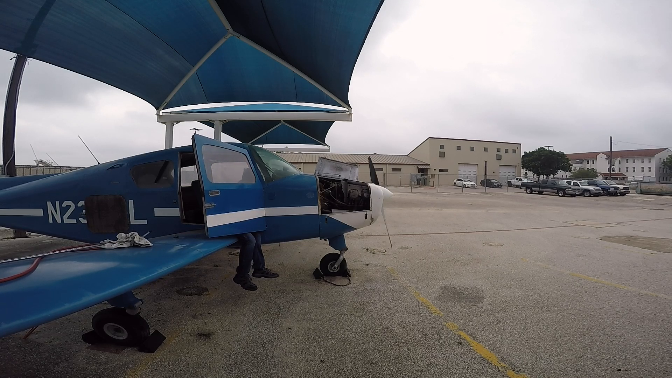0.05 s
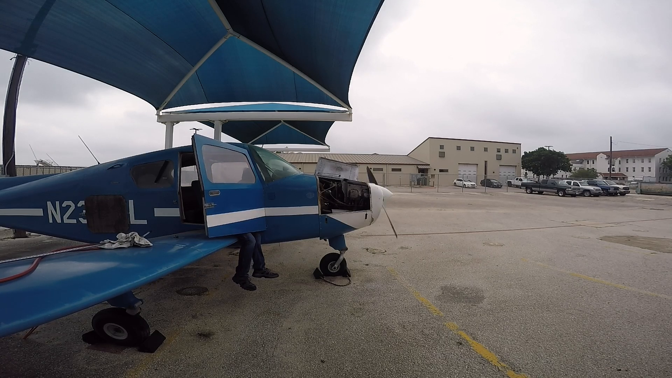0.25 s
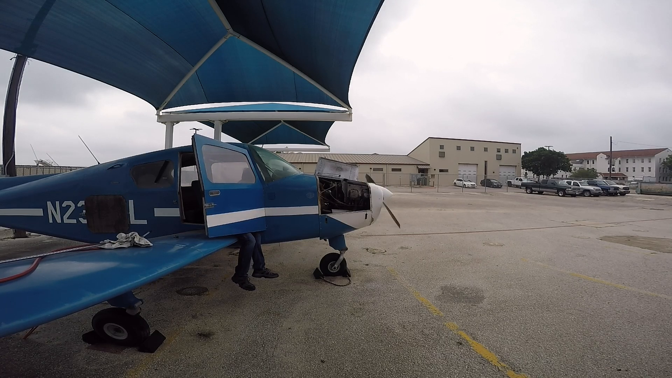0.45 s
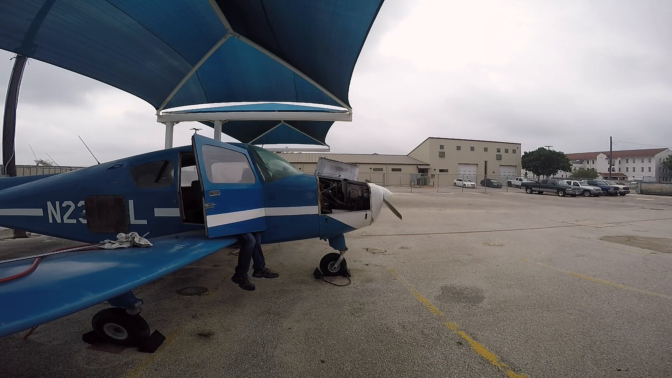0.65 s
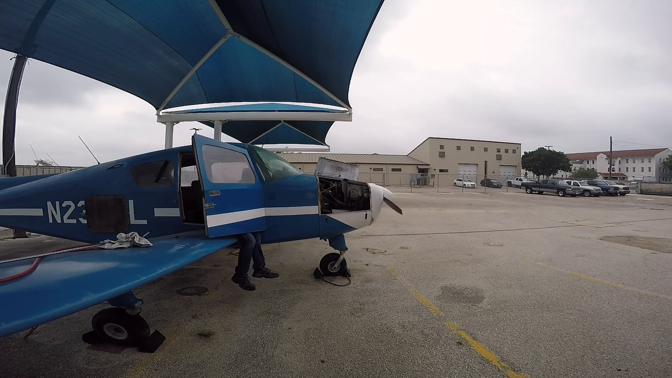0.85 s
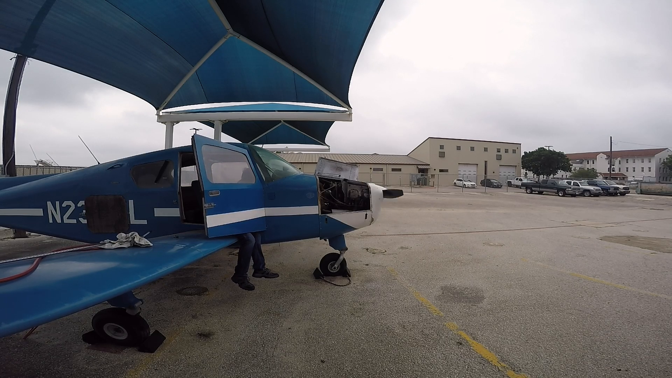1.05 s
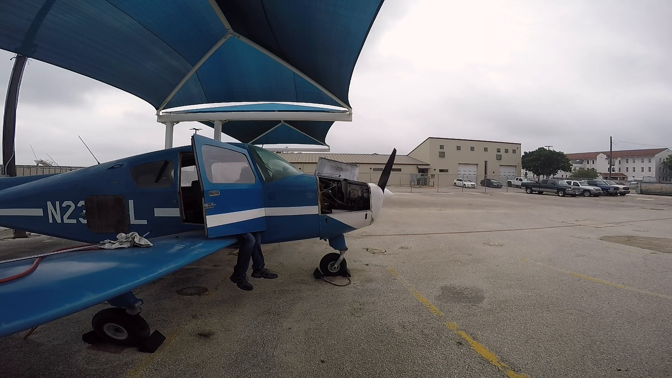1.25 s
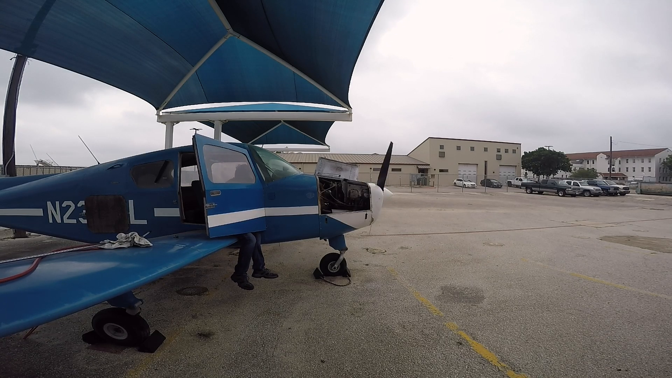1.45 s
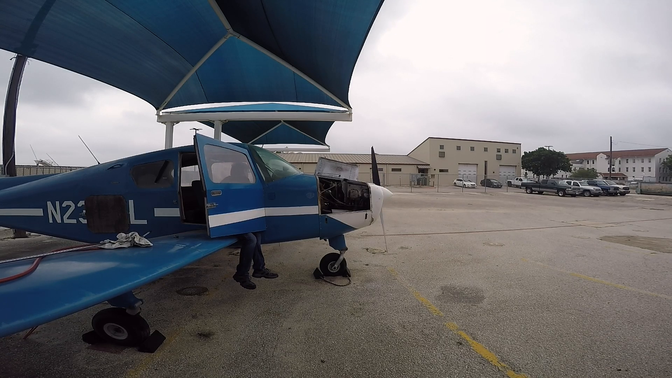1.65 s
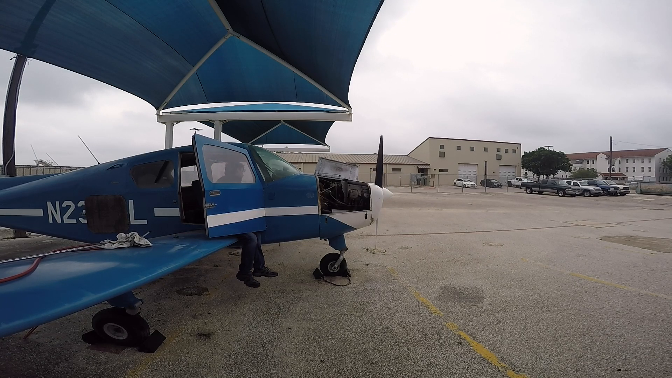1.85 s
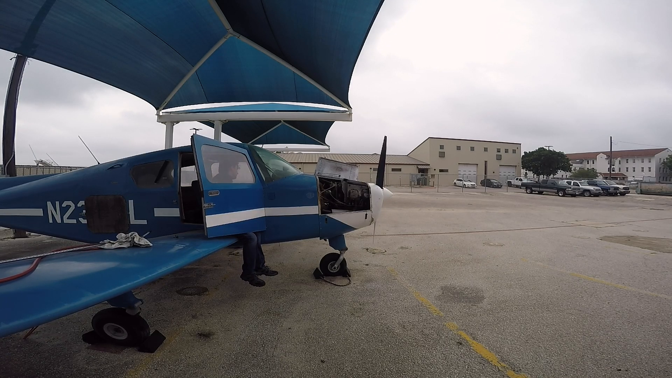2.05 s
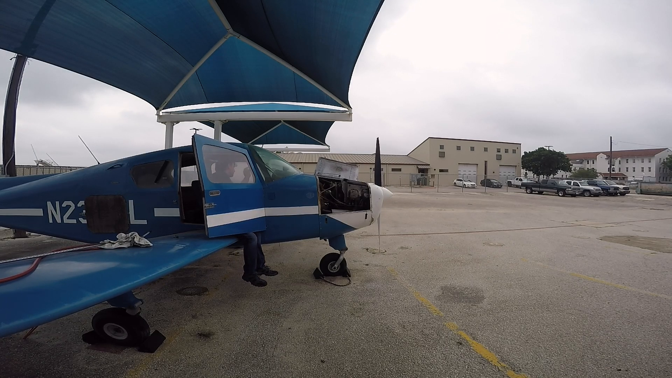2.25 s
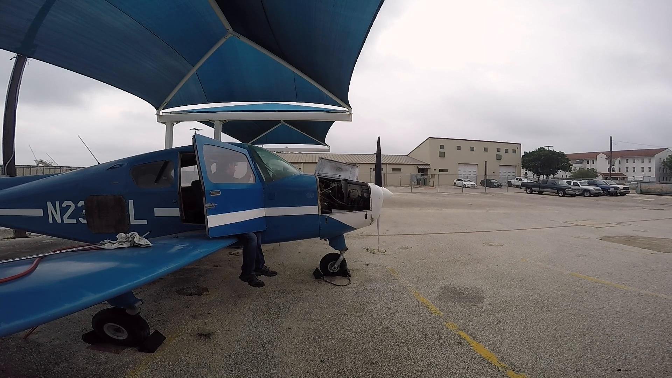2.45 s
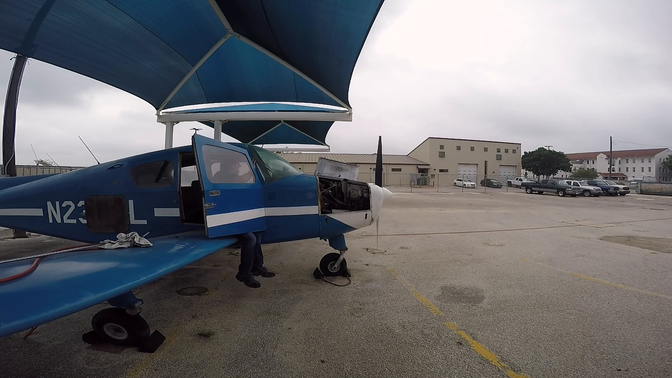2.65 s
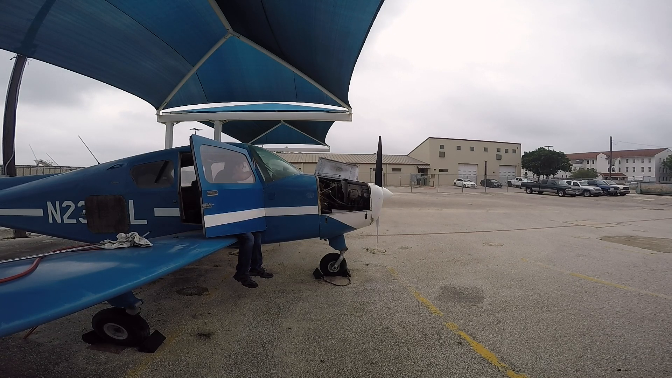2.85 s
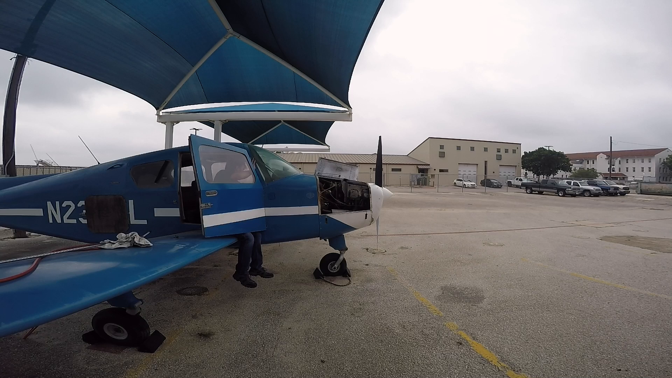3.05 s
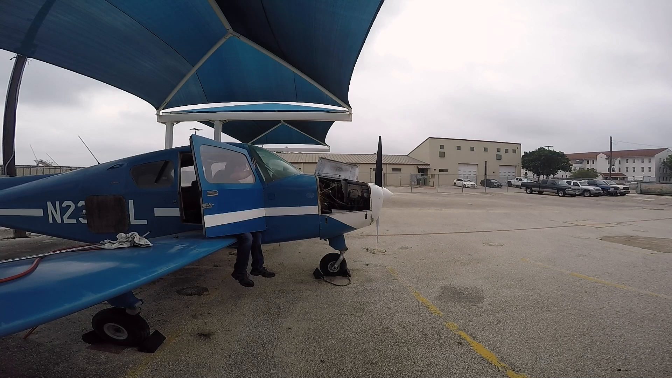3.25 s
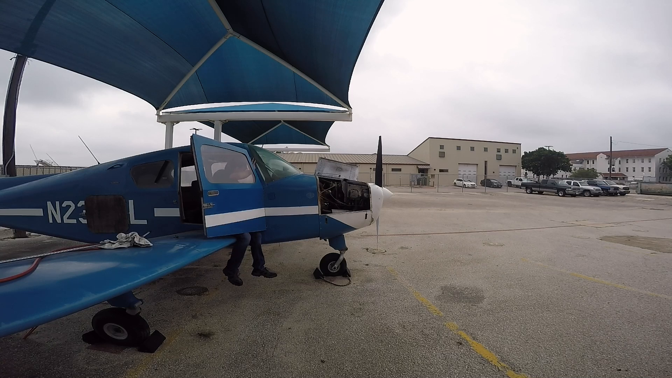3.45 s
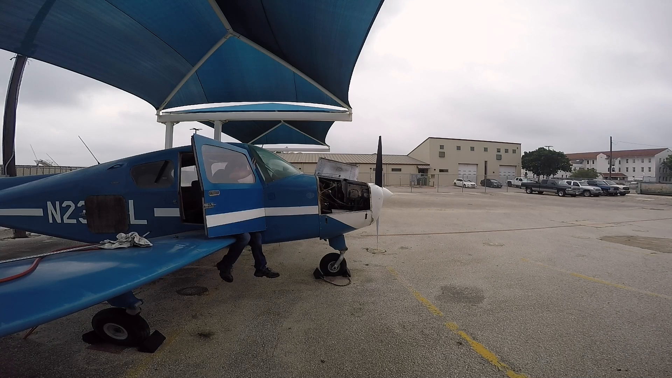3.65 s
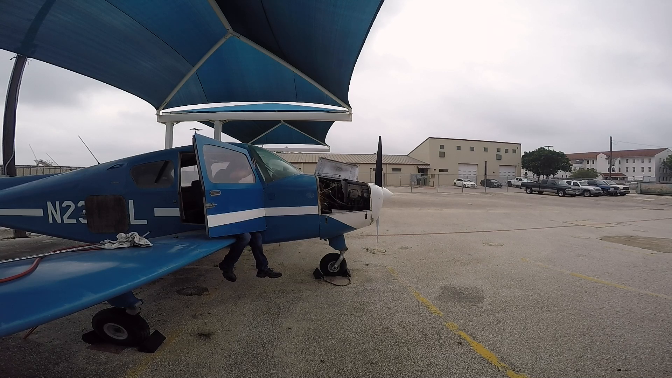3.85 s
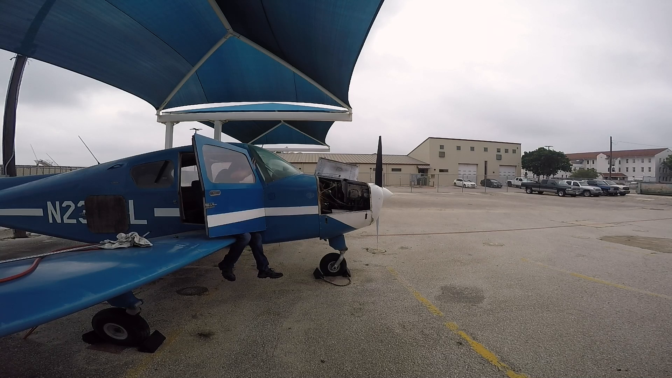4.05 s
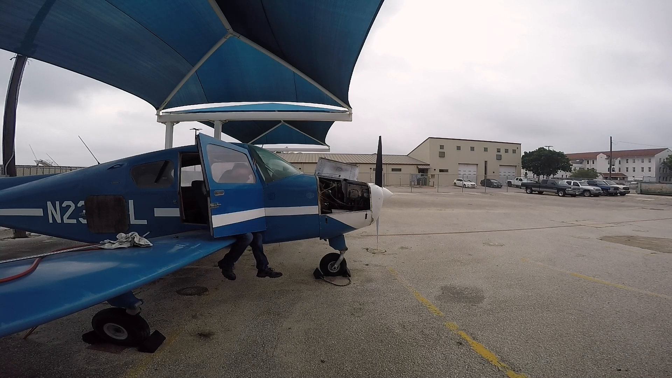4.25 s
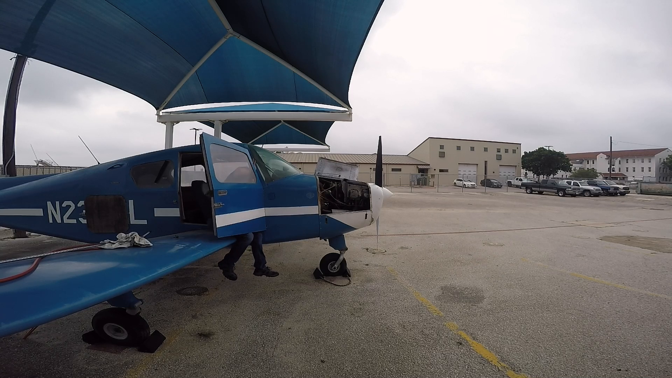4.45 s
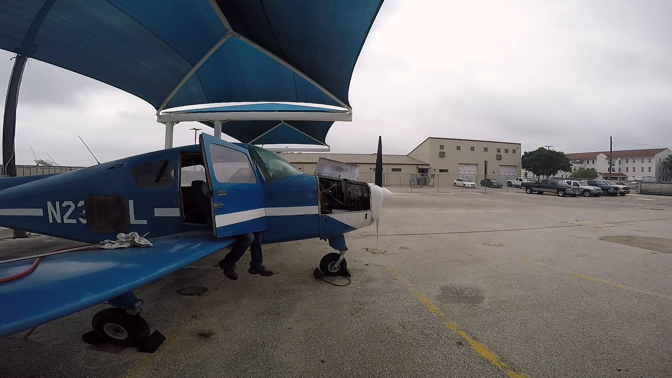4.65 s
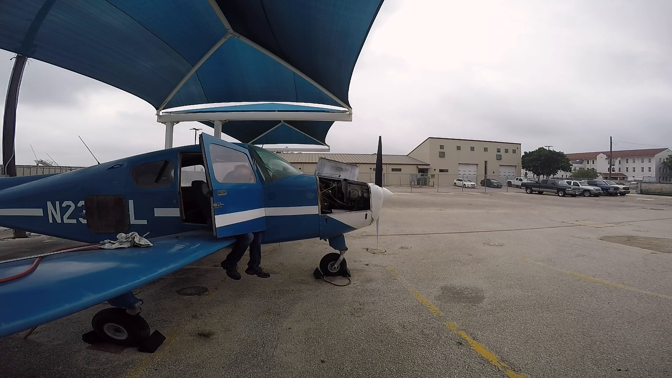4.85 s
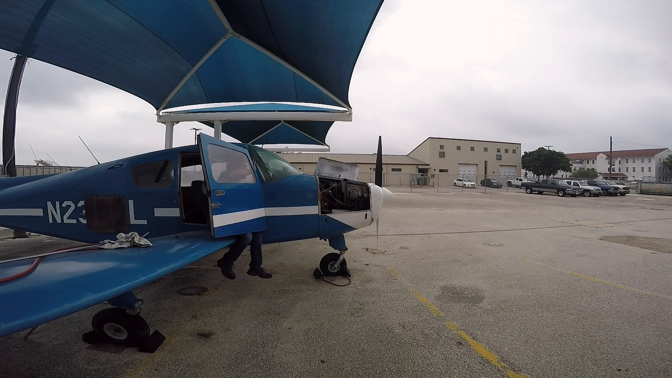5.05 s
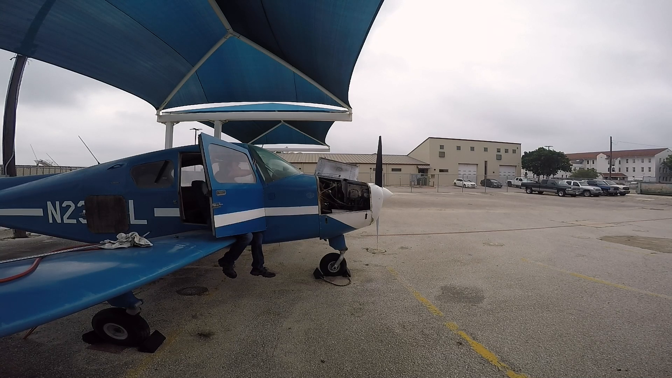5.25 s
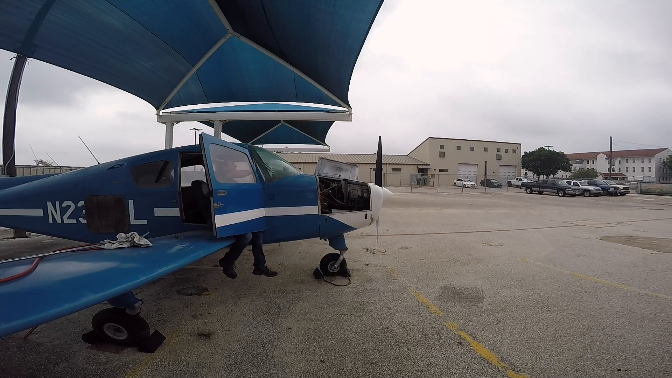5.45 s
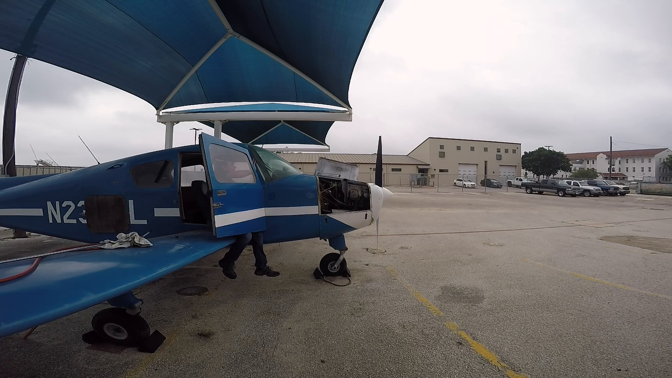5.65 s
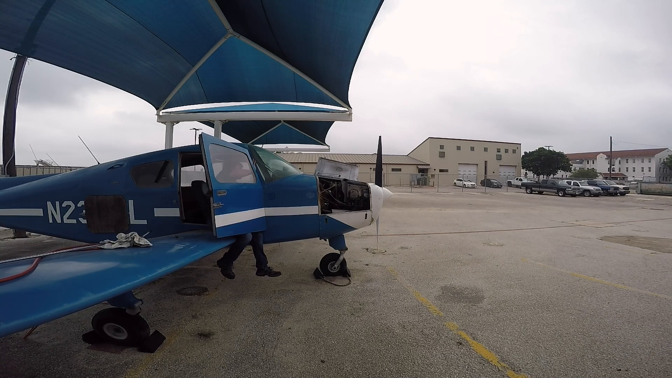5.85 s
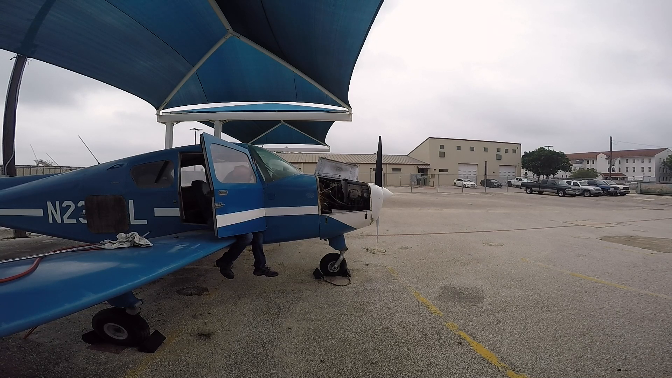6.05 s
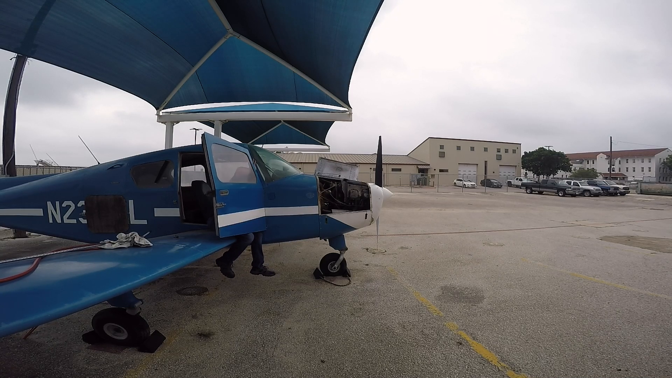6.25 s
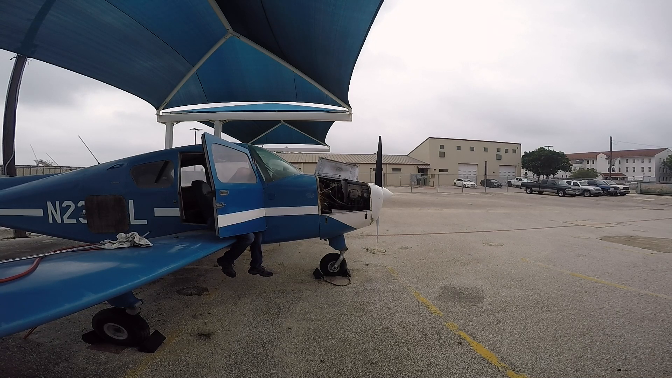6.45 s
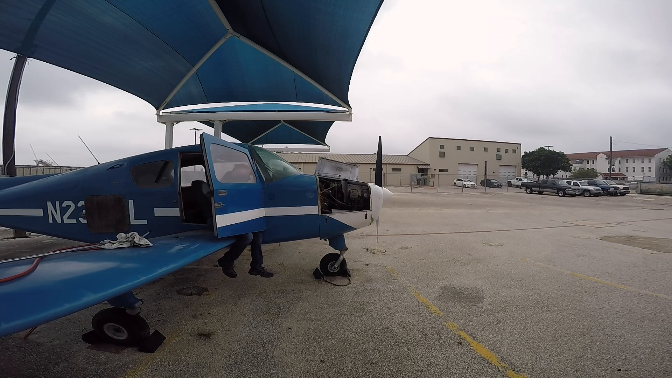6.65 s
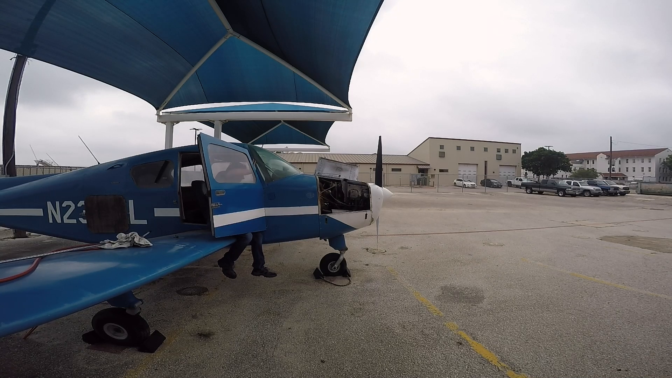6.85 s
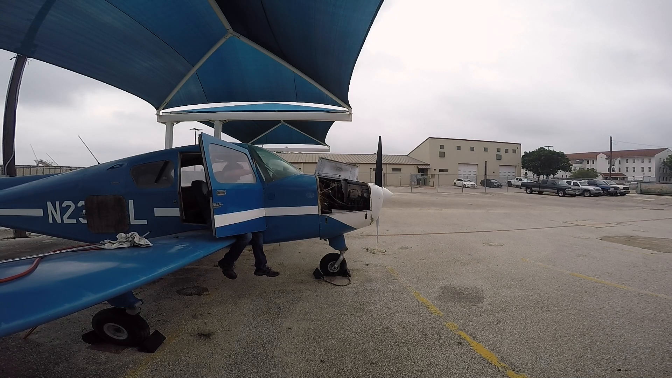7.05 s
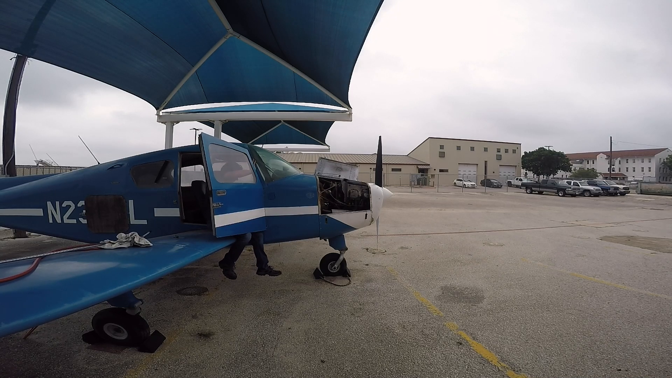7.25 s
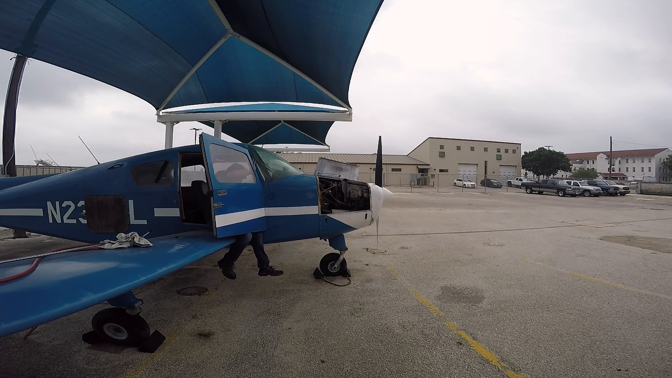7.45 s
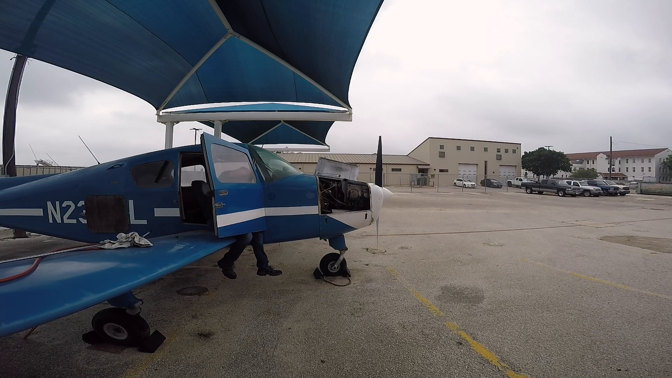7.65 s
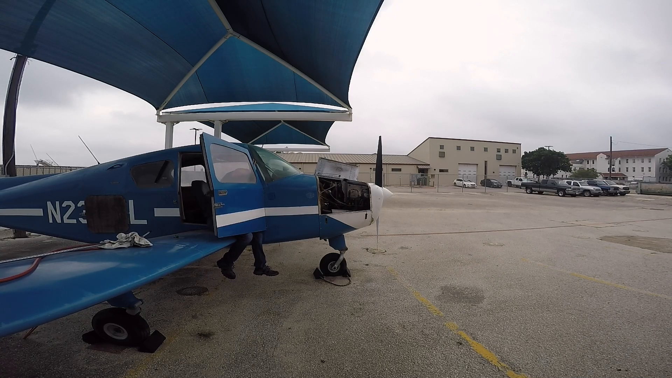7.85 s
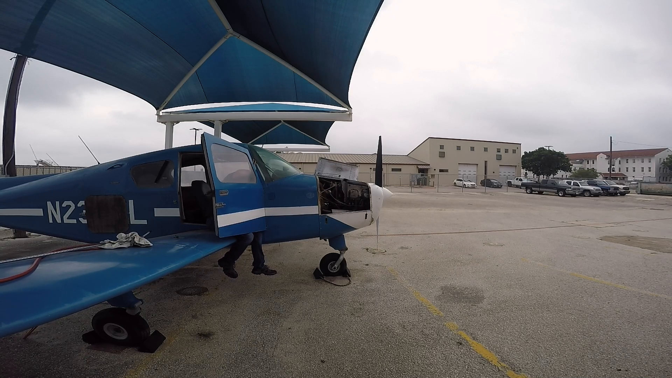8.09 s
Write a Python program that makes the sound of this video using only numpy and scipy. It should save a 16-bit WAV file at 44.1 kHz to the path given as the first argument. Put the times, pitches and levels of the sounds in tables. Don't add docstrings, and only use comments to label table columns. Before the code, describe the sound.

A small aircraft engine chugs over on its starter without catching, rattles to a stop, then a distant engine idles with ticking valves, wind and footsteps.

```python
import sys
import numpy as np
from scipy import signal
from scipy.fft import rfft, irfft
from scipy.io import wavfile
from scipy.ndimage import uniform_filter1d

SR = 44100
rng = np.random.default_rng(int(sys.argv[2]) if len(sys.argv) > 2 else 0)


def gain_from_db(level_db):
    decades = np.asarray(level_db, float) / 20
    return 10 ** decades


def master_out(mix):
    frames = np.transpose(np.atleast_2d(mix))
    ceiling = np.clip(frames, -1, 1)
    pcm = np.round(ceiling * 32767).astype(np.int16)
    wavfile.write(sys.argv[1], SR, pcm)


N = 358091
T = np.arange(N) / SR


def noise():
    return rng.standard_normal(N)


def evened(x):
    return x / np.sqrt(np.mean(x ** 2) + 1e-20)


def curve(rows, axis=1):
    rows = np.asarray(rows, float)
    return np.interp(T, rows[:, 0], rows[:, axis])


def colour(x, air, modes=(), air_db=0, size=16384):
    hz = np.fft.rfftfreq(size, 1 / SR)
    air_hz, db = np.transpose(air)
    smooth_db = np.interp(np.log(hz + 1), np.log(air_hz), db, -90, -90)
    power = gain_from_db(smooth_db + air_db) ** 2
    for mode_hz, width, mode_db in modes:
        power = power + gain_from_db(mode_db) ** 2 / (1 + ((hz - mode_hz) / width) ** 2 * 2) ** 2
    fold = irfft(np.log(power) / 2)
    fold[1:size // 2] *= 2
    fold[size // 2 + 1:] = 0
    taps = irfft(np.exp(rfft(fold)))
    return signal.oaconvolve(x, taps / np.linalg.norm(taps))[:N]


def ring(x, hz, width):
    r = np.exp(-np.pi * width / SR)
    poles = [1, -2 * r * np.cos(2 * np.pi * hz / SR), r * r]
    return signal.lfilter([1, 0, -1], poles, x) * np.sqrt((1 - r * r) / 2)


def lumps(hz):
    f = np.fft.rfftfreq(N // 32 * 2, 16 / SR)
    phase = np.exp(2j * np.pi * rng.random(len(f)))
    slow = irfft(phase * (f > 0) / (1 + (f / hz) ** 2))
    return np.interp(T, np.arange(len(slow)) * 16 / SR, evened(slow))


def restless(drive, modes, hz, spread_db):
    crank = 2 * SR
    rung = 0
    for mode_hz, width, db in modes:
        push = drive[:crank] * gain_from_db(db + spread_db * lumps(hz)[:crank])
        twice = ring(ring(push, mode_hz, width), mode_hz, width)
        rung = rung + twice / np.sqrt(SR / 6 / width)
    return np.pad(rung, (0, N - crank))


def blow(s, db, rise, t60):
    age, out = T[:SR], np.zeros(N + SR)
    out[round(s * SR):][:SR] = gain_from_db(db - 60 * age / t60) * np.clip(age / rise, 0, 1) ** 2
    return out[:N]


def held(s, length, db, edge):
    return gain_from_db(db) * np.clip(np.minimum(T - s, s + length - T) / edge, 0, 1)


# start in seconds, level in dB, rise in seconds, t60 in seconds, muffler in dB.
PUFFS = [
    (0, -23.5, 0.0011, 1, -17.5),
    (0.154, -17.5, 0.007, 0.54, -18),
    (.374, -16.5, 0.011, 0.58, -20),
    (0.587, -17, 0.0075, 0.44, -16.5),
    (0.799, -16.5, 0.011, 0.61, -19.5),
    (0.994, -17.5, 0.0091, 0.4, -18),
    (1.408, -23.5, 0.026, 0.53, -14),
]
# pitch in Hz, width in Hz, level in dB.
PIPE_MODES = [(630, 51, -10.5), (932, 48, -4), (1214, 56, -5), (1530, 53, -3.5), (1934, 82, 1),
              (2150, 19, 2), (2380, 110, -0.5), (2757, 160, -0.5), (2800, 19, -9), (3440, 48, -15.5),
              (4160, 130, -10), (4630, 270, -15)]
# pitch in Hz, level in dB per Hz.
PIPE_AIR = [(110, -57), (180, -12.5), (922, -14.5), (1650, -4.5), (2360, -11), (2590, -11), (2790, -4),
            (5590, -13), (12300, -17), (15100, -31), (16000, -60.5)]
# pitch in Hz, width in Hz, level in dB.
MUFFLER_MODES = [(267, 34, -9.5), (426, 500, -6.5), (651, 105, -13.5), (915, 95, -21), (1163, 86, -4.5),
                 (1320, 430, -7), (770, 1020, 0)]


def exhaust():
    push = 0
    slow = blow(0, PUFFS[0][4], 0.0012, 0.23)
    for s, db, rise, t60, _ in PUFFS:
        crack = blow(s, db + 2.0, rise, 0.14)
        push = push + blow(s, db, rise, t60) + crack
    for s, _, rise, t60, muffler_db in PUFFS[1:]:
        slow = slow + blow(s - .6 * rise, muffler_db, rise + .018, 1.1 * t60)
    air = gain_from_db(1.2 * lumps(50)) * noise()
    muffler = restless(slow * air * gain_from_db(-6), MUFFLER_MODES, 16, 1.5)
    return colour(push * air, PIPE_AIR, PIPE_MODES, air_db=-6.5) + muffler


# start in seconds, end in seconds, hiss in dB, gear load in dB.
SQUEEZES = [
    (0.053, 0.155, -20.5, -24),
    (0.267, 0.379, -19, -23),
    (0.481, 0.593, -20.5, -23.5),
    (0.689, 0.807, -20.5, -26.5),
    (0.892, 0.995, -23, -25.5),
    (1.117, 1.314, -19.5, -25),
]
SQUEEZE_FULL = 0.54
BLOWDOWN_DB = [-25, -25.5, -23, -24.5, -25, -27]
# start, fullest and end in seconds, level in dB, whistle in dB.
SETTLES = [
    (1.324, 1.33, 1.35, -22, -12),
    (1.403, 1.545, 1.636, -33.5, -17),
    (1.611, 1.635, 1.9, -49, -8),
]


def leak_rows():
    rows = [(a, a + SQUEEZE_FULL * (b - a), b, db, -7.5) for a, b, db, _ in SQUEEZES]
    full_s, length_s = 0.031, 0.12
    opens = [-length_s / 2] + [puff[0] - 0.0087 for puff in PUFFS[1:]]
    for s, db in zip(opens, BLOWDOWN_DB):
        rows.append((max(s, 0), max(s + full_s, 0), s + length_s, db, -14))
    return rows + list(SETTLES)


# pitch in Hz, width in Hz, level in dB.
SEAT_MODES = [(6690, 200, -13), (7200, 600, -5), (8450, 700, -2), (7850, 1300, -2.5), (9950, 150, -11.5)]
# pitch in Hz, level in dB per Hz.
SEAT_AIR = [(2500, -35), (4000, -27), (6000, -24), (9500, -31), (12000, -25), (16000, -39)]
# pitch in Hz, width in Hz.
WHISTLE = (12020, 380)


def leaks():
    flow, edge = np.zeros((2, N))
    for start, full, end, db, whistle_db in leak_rows():
        span = slice(round(start * SR), round(end * SR))
        swell_db = np.interp(T[span], [start, full, end], [-7, 0, -9])
        gate = np.clip(np.minimum(T[span] - start, end - T[span]) / 0.011, 0, 1)
        flow[span] += gate * gain_from_db(db + swell_db)
        edge[span] += gate * gain_from_db(db + whistle_db + 2.2 * swell_db)
    air = gain_from_db(1.0 * lumps(90)) * noise()
    hiss = colour(flow * air * gain_from_db(-13.0), SEAT_AIR)
    seats = restless(flow * air * gain_from_db(-2.5), SEAT_MODES, 21, 3.06)
    whistle = restless(edge * air, [(WHISTLE[0], WHISTLE[1], 0)], 40, 3.1)
    return hiss + seats + whistle


SLACK_DB = -28.5


def squeeze():
    arch, load_db = np.zeros((2, N))
    for start, end, _, gear_db in SQUEEZES:
        stroke = np.interp(T, [start, start + SQUEEZE_FULL * (end - start), end], [0, 1, 0])
        arch += stroke
        load_db += stroke * (gear_db - SLACK_DB)
    return arch, load_db


# time in seconds, level in dB.
ENGAGED = [
    (0, -1),
    (1.3, 0.5),
    (1.35, -9),
    (1.375, -8),
    (1.41, -10),
    (1.47, 1),
    (1.55, -0.2),
    (1.62, -21),
    (1.8, -19.5),
]


def mesh_tone(arch):
    fuzz = lumps(77) + 1j * lumps(53)
    opens = np.array(PUFFS)[:, 0]
    age = T - opens[np.searchsorted(opens, T, "right") - 1]
    hz = 2202 + 202 * np.exp(-age / .07) + 420 * age
    db = -32 + 15.5 * np.exp(-age / 0.04) + 8 * arch + curve(ENGAGED)
    tone = (fuzz * np.exp(2j * np.pi * np.cumsum(hz) / SR)).real
    return tone * gain_from_db(uniform_filter1d(db, size=400) - 3.0) * np.clip((1.8 - T) / .03, 0, 1)


# time in seconds, brush pitch in Hz, level in dB.
COAST = [
    (1.54, 1560, -64),
    (1.62, 1340, -57),
    (1.7, 1090, -58),
    (1.8, 880, -65),
    (1.86, 790, -74),
]


def rotor_whine():
    turns = np.cumsum(curve(COAST) * (1 + .008 * lumps(60))) / SR
    whine = sum(gain_from_db(.5 + 3.2 * lumps(20)) * np.sin(2 * np.pi * k * turns) for k in range(3, 8))
    return whine * gain_from_db(curve(COAST, axis=2)) * (T > COAST[0][0]) * (T < COAST[-1][0])


# time in seconds, peak in dB.
CLACKS = [
    (0.195, -4.5),
    (0.3187, -14),
    (0.5344, -22),
    (0.745, -15),
    (1.0405, -15),
    (1.1933, -7),
    (1.267, -9.5),
    (1.33, -12.5),
    (1.492, -23),
    (1.632, -20),
]
# pitch in Hz, width in Hz, level in dB.
CASE_MODES = [(1170, 70, -15), (1380, 70, -16), (1820, 50, -11), (1950, 60, -11), (2075, 60, -8),
              (2300, 140, -10), (2760, 90, -6), (2870, 110, -5), (3120, 80, -12), (3490, 150, -14)]
# pitch in Hz, level in dB per Hz.
CASE_AIR = [(150, -35), (400, -21.5), (1500, -17), (3500, -16.5), (6000, -30.5), (15000, -40)]


def starter():
    knock_gain = gain_from_db(1.4 * rng.exponential(1, N).clip(0, 4))
    teeth = knock_gain * (rng.random(N) < 2500 / SR) * rng.choice([-1, 1], N)
    teeth = evened(teeth) * np.clip((2.04 - T) / .3, 0, 1)
    arch, load_db = squeeze()
    load = gain_from_db(SLACK_DB + load_db + curve(ENGAGED) + 3.05 * lumps(12))
    clacks = sum(blow(s, db - 9.0, 0.0033, 0.082) for s, db in CLACKS)
    drive = (load * teeth + clacks * noise()) * gain_from_db(-2.0)
    case = colour(drive, CASE_AIR) + restless(drive, CASE_MODES, 6.9, 3.7)
    return case + mesh_tone(arch) + rotor_whine()


# start in seconds, peak in dB, rise in seconds, t60 in seconds.
PAWL = (1.966, -35, .009, .18)


def pinion_drop():
    return colour(blow(*PAWL) * noise(), CASE_AIR)


# start in seconds, length in seconds, level in dB.
SQUEALS = [
    (.655, .16, -32.5),
    (1.215, 0.091, -31),
    (3.76, .05, -55),
    (3.97, .08, -57),
    (4.23, .05, -58),
]
# pitch in Hz, width in Hz, level in dB.
SHUDDER_MODES = [(25.6, 7, -27.5), (65.8, 5.7, -38.5), (95.8, 8.2, -34.5)]


def airframe():
    squeal = 0
    for s, length, db in SQUEALS:
        age = T - s
        cycles = (1785 + 307 * age / 2) * age
        squeal = squeal + held(s, length, db, 0.018) * np.sin(2 * np.pi * cycles)
    shake = gain_from_db(curve(ENGAGED)) * (T < ENGAGED[-2][0]) * noise()
    return squeal * gain_from_db(2.5 * lumps(30)) + restless(shake, SHUDDER_MODES, 2.5, 1.5)


# time in seconds, peak in dB, knock in Hz, scuff t60 in seconds.
STEPS = [
    (4.107, -29, 1380, 0.13),
    (4.695, -22, 1050, 0.22),
    (4.734, -30, 2430, 0.091),
    (5.885, -30, 970, 0.19),
    (6.452, -22.5, 1070, 0.15),
]
# pitch in Hz, level in dB per Hz.
SCUFF_AIR = [(150, -41), (400, 12.5), (1000, 2), (2500, -2), (4500, -18), (8000, -9), (15000, -15)]


def steps():
    grit = noise()
    knock, thud, scuff = np.zeros((3, N))
    for s, db, hz, t60 in STEPS:
        knock += ring(blow(s + .0015, db + 5.5, .0006, .004), hz, 120)
        thud += blow(s + 0.0016, db - 11.5, 0.0028, 0.11)
        scuff += blow(s, db - 14.0, 0.00067, t60)
    return knock + ring(thud * grit, 280, 250) + colour(scuff * grit, SCUFF_AIR)


# multiple of the turn rate, level in dB.
ORDERS = [(2, -31.5), (3, -29.5), (4, -36.5)]
# multiple of the turn rate, level in dB.
FAINT_ORDERS = [(1, -70), (5, -42.5), (6, -55), (7, -66), (8, -59), (10, -52.5)]
# time in seconds, level in dB.
IDLE = [(0, -5.5), (1.05, -12), (1.3, 0), (1.9, 1), (2.5, 0.5), (3.2, -0.7), (4.2, -0.1), (5, -1.7),
        (6, -1.5), (7.25, -0.7), (7.45, -2), (7.7, -0.5), (8.12, -0.5)]


def idle_hum(turns):
    hum = 0
    for k, db in ORDERS:
        gain = gain_from_db(2.5 + db + curve(IDLE) + .7 * lumps(0.86))
        hum = hum + gain * np.sin(2 * np.pi * (k * turns + rng.random()))
    for k, db in FAINT_ORDERS:
        gain = gain_from_db(db + 3.3 * lumps(4.0))
        hum = hum + gain * np.sin(2 * np.pi * (k * turns + rng.random()))
    return hum


IDLE_HZ = 26.15


def tick_level():
    return -52 + 1.36 * curve(IDLE)


def luck(turn):
    return rng.standard_normal(turn.max() + 1).clip(-1.5, 1.5)[turn]


# pitch in Hz, width in Hz, level in dB.
COVER_MODES = [(4700, 130, -8), (6950, 400, -2), (7960, 200, -4), (8940, 220, -1), (9520, 250, -3),
               (10150, 300, -3), (11200, 300, -2), (13000, 300, -6), (14100, 220, -6)]
# pitch in Hz, level in dB per Hz.
COVER_AIR = [(800, -30), (1600, -9.5), (3000, -6), (5400, -24.5), (8000, -7), (14500, -14), (16000, -14)]


def valve_ticks(late):
    turn, age = late.astype(int), late % 1 / IDLE_HZ
    second = np.maximum(age - .0115, 0)
    tick = gain_from_db(-60 * age / .045) * np.clip(age / .003, 0, 1)
    tick = tick + gain_from_db(-14 - 60 * second / .045) * (second > 0)
    tick = tick + gain_from_db(-10 - 60 * age / .3)
    tick = tick * gain_from_db(tick_level() + 8.0 + 1.4 * luck(turn)) * noise()
    shake = tick * rng.choice([-1, 1], N)
    cover = 0
    for k, (hz, width, db) in enumerate(COVER_MODES):
        cover = cover + (-1) ** k * ring(shake * gain_from_db(db - 7.0 + 3.2 * luck(turn)), hz, width)
    return colour(tick, COVER_AIR) + cover


# pitch in Hz, width in Hz, level in dB, delay in seconds, spread in dB.
PANELS = [(2955, 24, 0, 0.00296, 1), (3320, 60, -11, .003, 3), (2776, 39, -6.5, 0.00403, 8.5),
          (1778, 22, -3, .011, 3), (1540, 18, -3, .011, 0), (1390, 18, -7.5, 0.013, 1.5)]


def struck_panels(turn):
    strike = (np.diff(turn, prepend=turn[0]) > 0) * gain_from_db(tick_level() + 23.0)
    panels = 0
    for hz, width, db, delay, spread_db in PANELS:
        hit = np.roll(strike * gain_from_db(db + spread_db * luck(turn)), round(delay * SR))
        panels = panels + ring(ring(hit, hz, width), hz, 600) / np.sqrt(SR / 4000)
    return panels


# start in seconds, length in seconds, level in dB.
SING = [
    (6.26, 0.15, -64),
    (6.435, .2, -60),
    (6.82, .18, -66),
    (7.03, 0.25, -60.5),
    (7.288, 0.16, -54.5),
    (7.534, 0.069, -56),
    (7.62, .17, -67),
]


def singing_metal():
    sing = sum(held(*row, .015) for row in SING) * gain_from_db(3 + 2.3 * lumps(17))
    return sing * np.sin(2 * np.pi * 2374 * T + .6 * lumps(10))


# time in seconds, lead in turns.
DRIFT = [(0.3, -1.12), (1.2, -1.25), (2.0, -1.42), (2.8, -1.66), (3.2, -1.73), (4.0, -1.755), (4.4, -1.71),
         (4.8, -1.74), (5.6, -1.65), (6.0, -1.5), (6.4, -1.44), (7.2, -1.38), (7.6, -1.2), (7.9, -1.15)]


def idling():
    turns = IDLE_HZ * T + curve(DRIFT) + 2
    late = turns + .012 * lumps(11)
    return idle_hum(turns) + valve_ticks(late) + struck_panels(late.astype(int)) + singing_metal()


# time in seconds, level in dB.
GUSTS = [(0, -15), (.15, -32), (.22, -30), (.4, -22), (.8, -25.5), (1.25, -23), (1.45, -27), (1.8, -25.5),
         (2.4, -26.5), (3.1, -24.5), (4, -28), (4.9, -24), (5.5, -26.5), (7.1, -25), (7.5, -30),
         (8.12, -27)]
# pitch in Hz, level in dB per Hz.
WIND_AIR = [(7.1, -42), (12, -3), (40, 1), (62, -5), (106, -14.5), (173, -30), (280, -21), (390, -60.5)]
# pitch in Hz, level in dB per Hz.
RAMP_AIR = [(59, -26.5), (100, -3), (174, -13.5), (433, -22), (1170, -31.5), (1800, -34.5), (2370, -40),
            (2990, -37.5), (5300, -44.5), (9210, -45), (14700, -85), (16000, -62)]


def ramp():
    wind = colour(gain_from_db(curve(GUSTS) - 4.0 + 1.26 * lumps(1.1)) * noise(), WIND_AIR)
    wash = colour(gain_from_db(-42 + 2.5 + .7 * lumps(6)) * noise(), RAMP_AIR)
    return wind + wash


def mains_hum():
    return gain_from_db(-45 + 2.5 * lumps(2.5)) * np.sin(2 * np.pi * 119 * T)


def canopy(x):
    taps = np.zeros(SR // 2)
    at = np.arange(200, len(taps) - 20, 20)
    signs = rng.choice([-1., 1.], len(at))
    taps[at + rng.integers(0, 20, len(at))] = signs * gain_from_db(-60 * at / SR / 0.42)
    return signal.oaconvolve(x, taps / np.linalg.norm(taps))[:N]


def scene():
    near = exhaust() + leaks() + starter() + pinion_drop() + steps()
    far = airframe() + idling() + ramp() + mains_hum()
    return (near + gain_from_db(-12.5) * canopy(near) + far)[None]


def band_limit(x):
    return signal.sosfilt(signal.butter(12, 16370, fs=SR, output="sos"), x)


def record(dry):
    ceiling = 1.1
    edge = signal.firwin(1201, 15380, window=("kaiser", 8), fs=SR)
    mix = signal.oaconvolve(ceiling * np.tanh(dry / ceiling), edge[None], "same")
    return band_limit(mix)


dry = scene()
out = record(dry)
master_out(out)
```